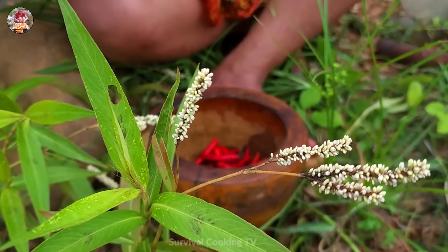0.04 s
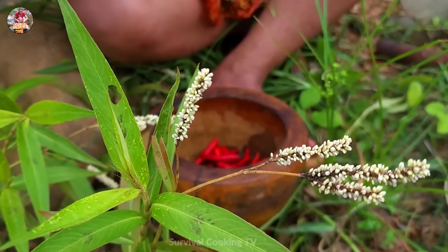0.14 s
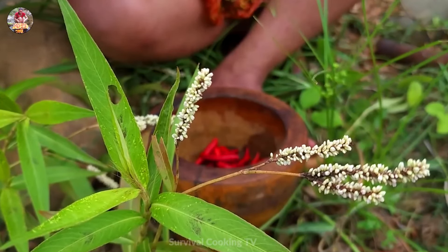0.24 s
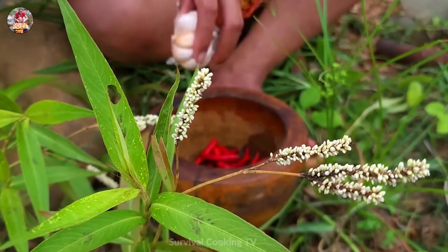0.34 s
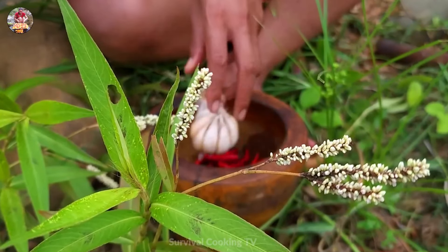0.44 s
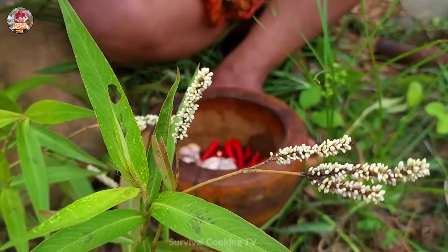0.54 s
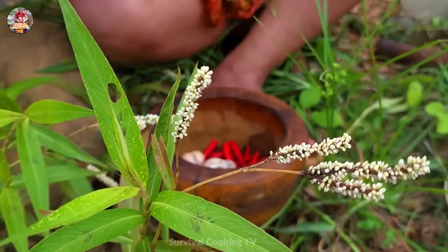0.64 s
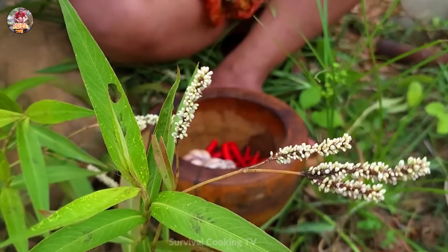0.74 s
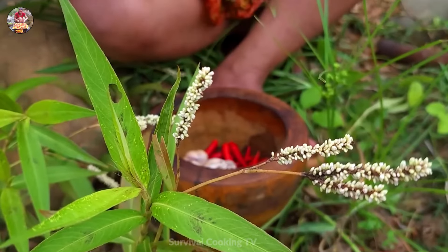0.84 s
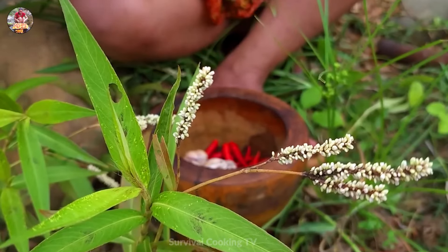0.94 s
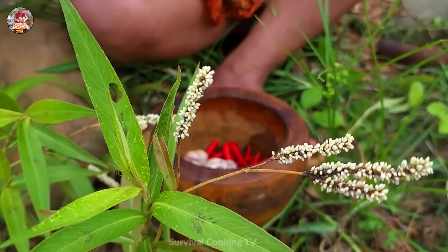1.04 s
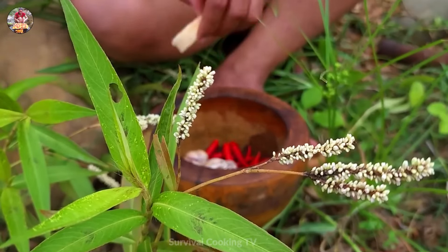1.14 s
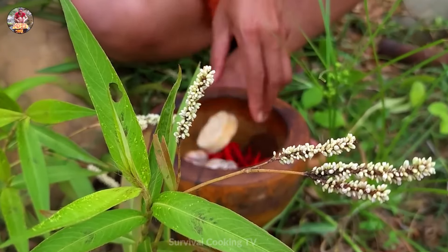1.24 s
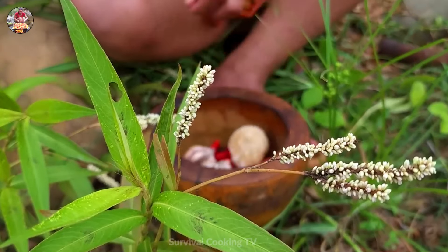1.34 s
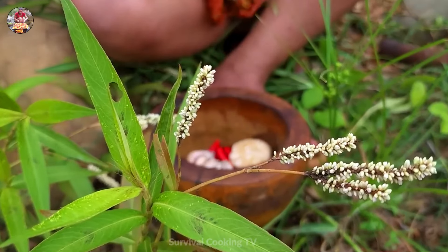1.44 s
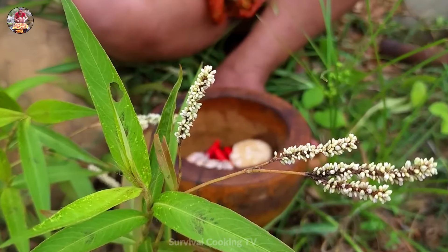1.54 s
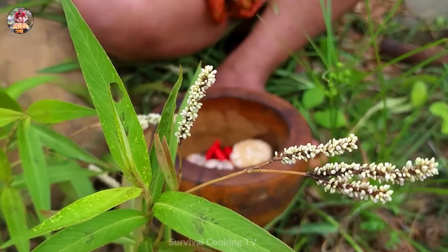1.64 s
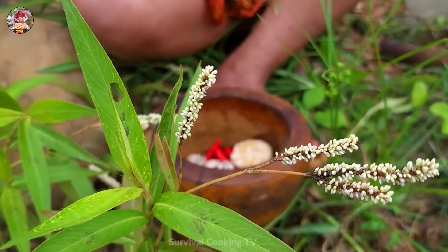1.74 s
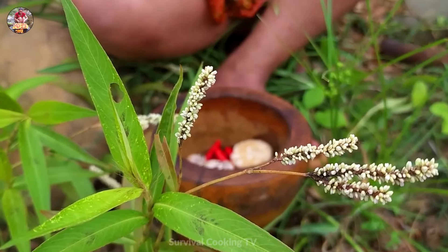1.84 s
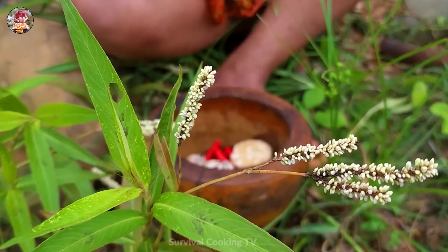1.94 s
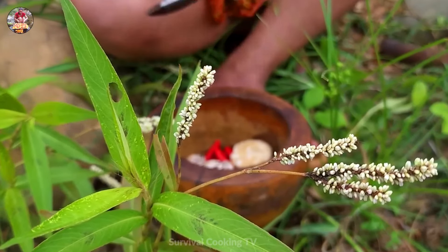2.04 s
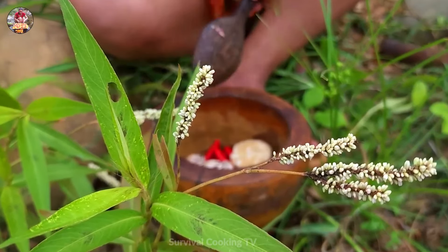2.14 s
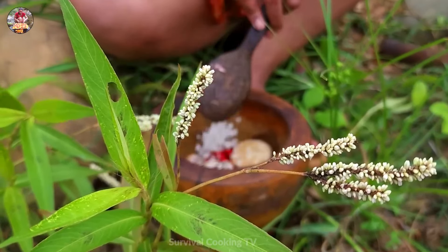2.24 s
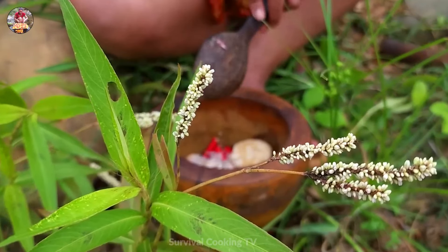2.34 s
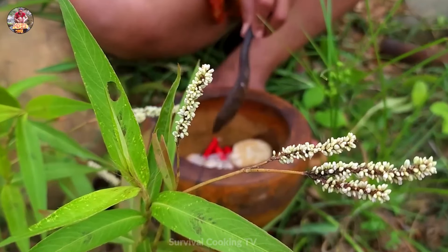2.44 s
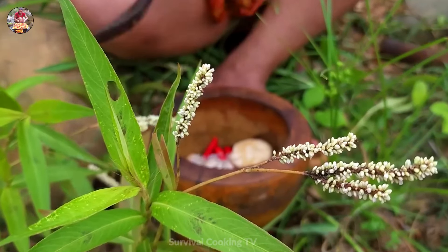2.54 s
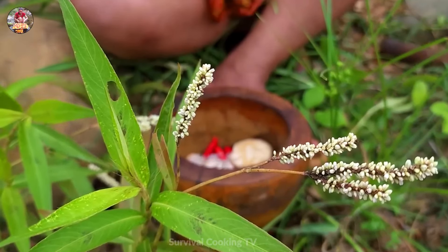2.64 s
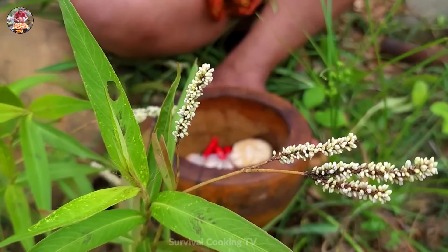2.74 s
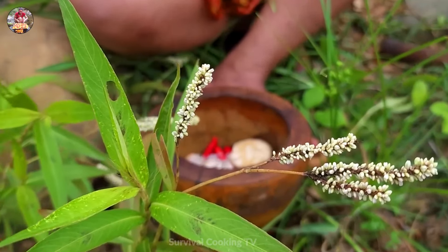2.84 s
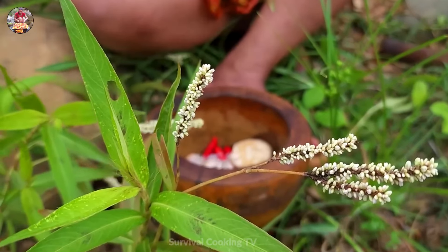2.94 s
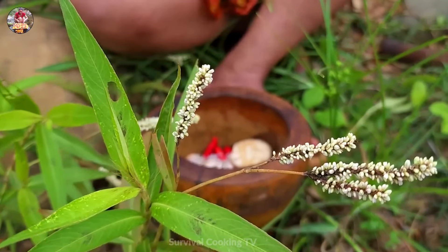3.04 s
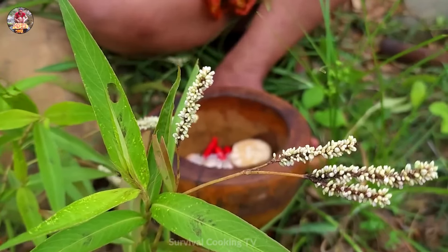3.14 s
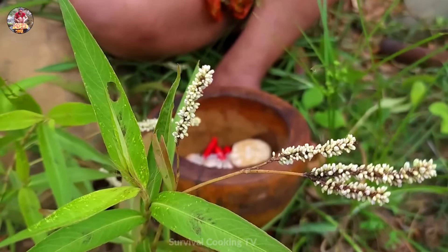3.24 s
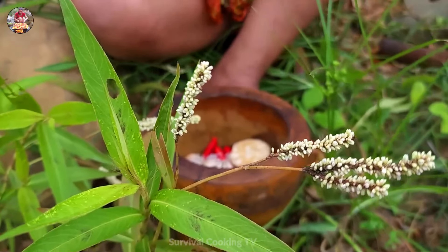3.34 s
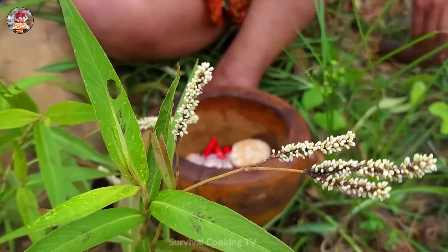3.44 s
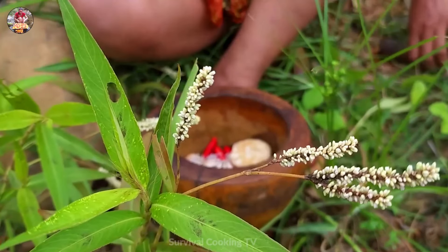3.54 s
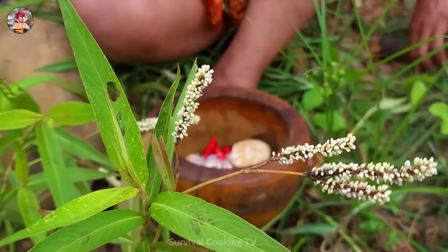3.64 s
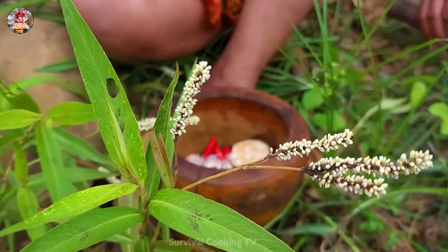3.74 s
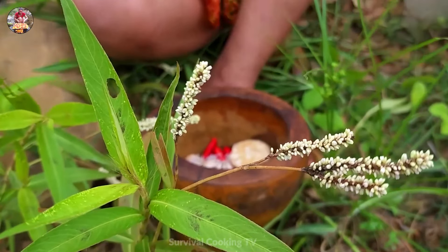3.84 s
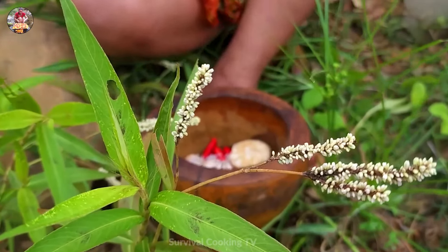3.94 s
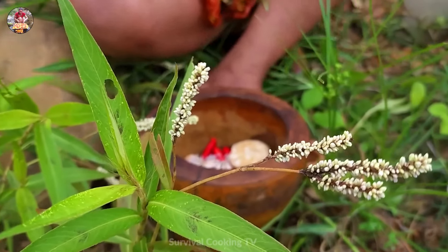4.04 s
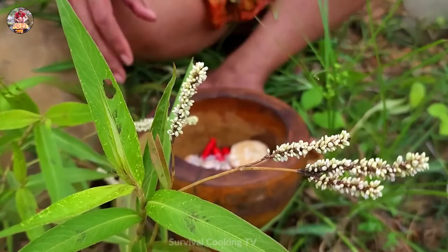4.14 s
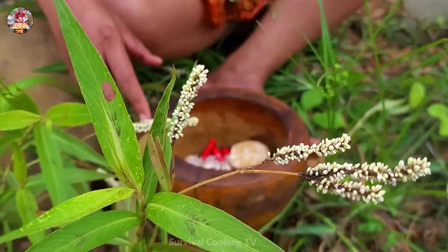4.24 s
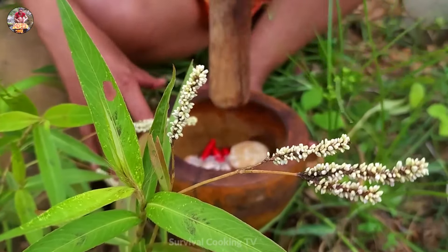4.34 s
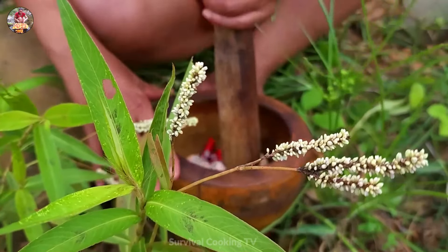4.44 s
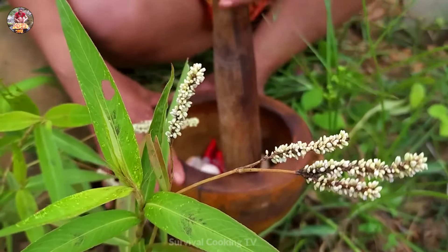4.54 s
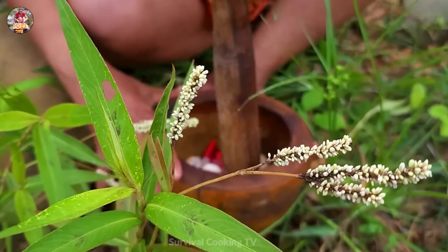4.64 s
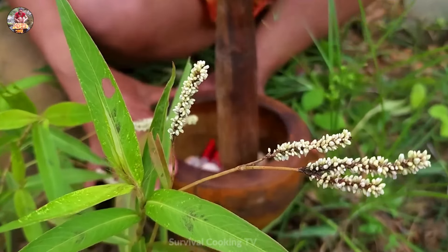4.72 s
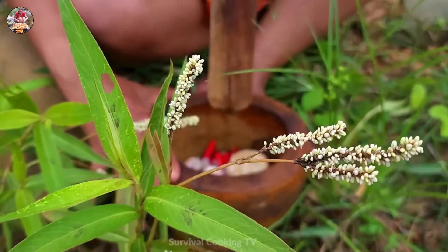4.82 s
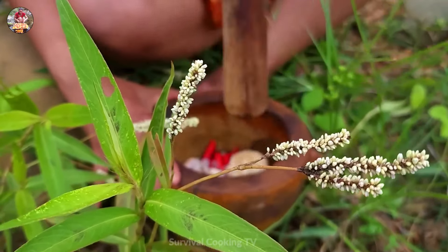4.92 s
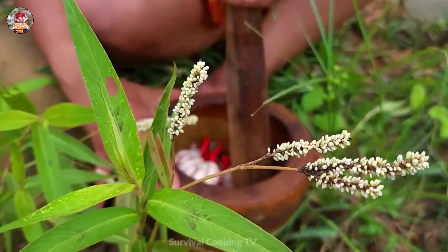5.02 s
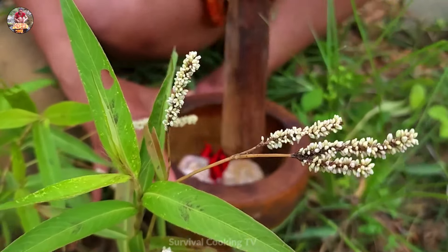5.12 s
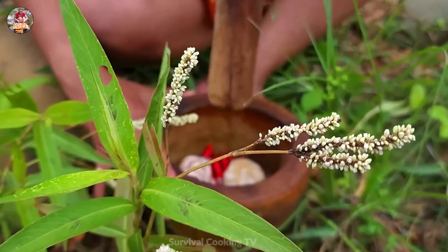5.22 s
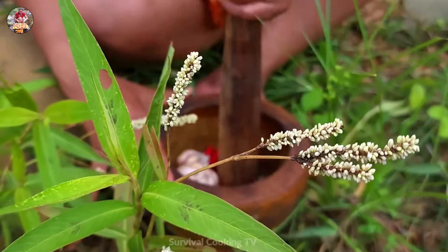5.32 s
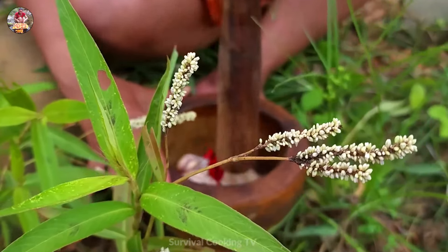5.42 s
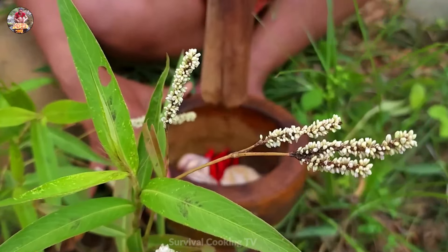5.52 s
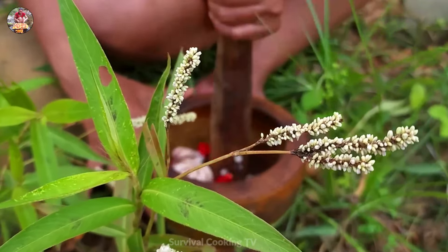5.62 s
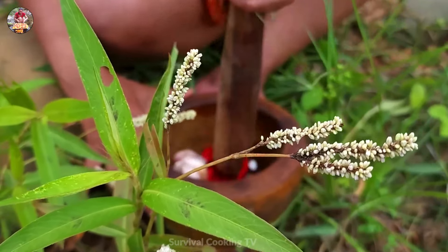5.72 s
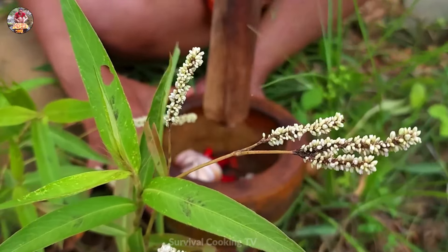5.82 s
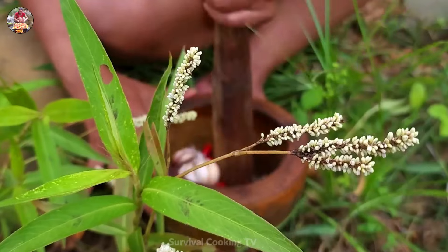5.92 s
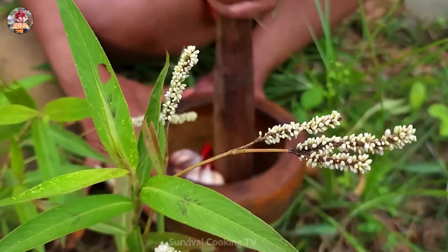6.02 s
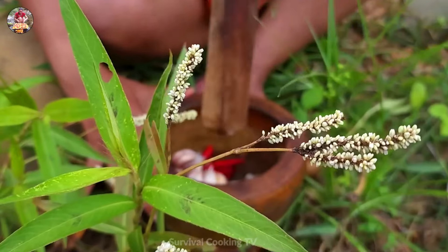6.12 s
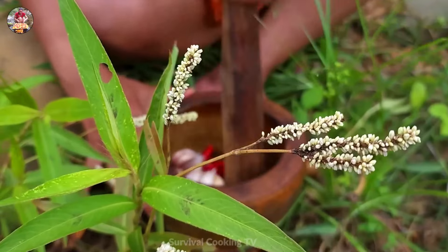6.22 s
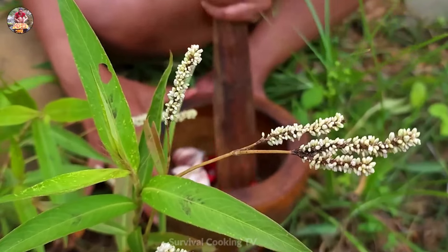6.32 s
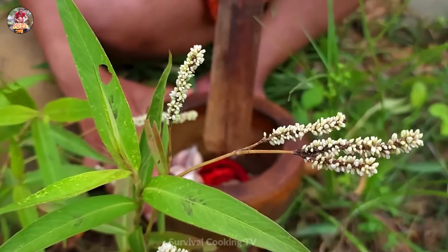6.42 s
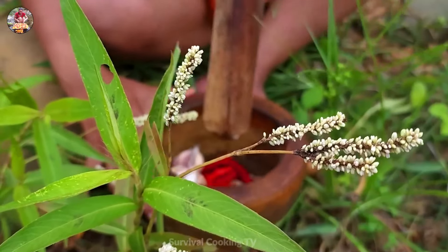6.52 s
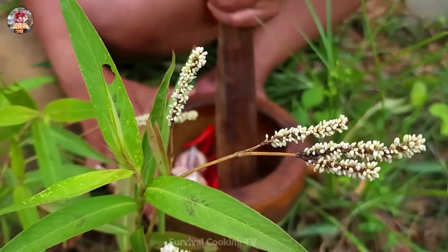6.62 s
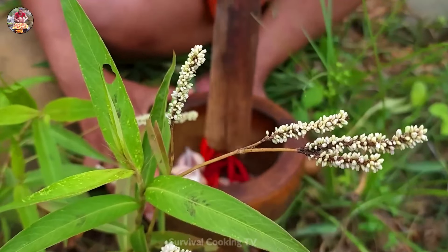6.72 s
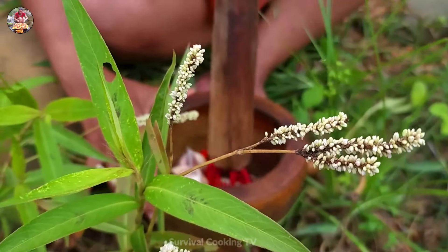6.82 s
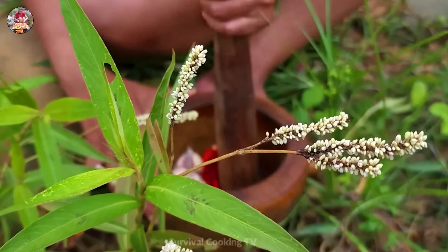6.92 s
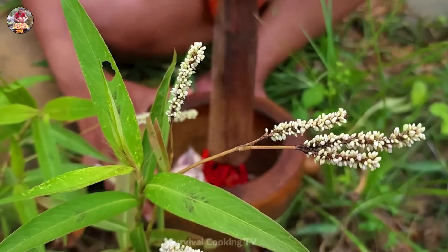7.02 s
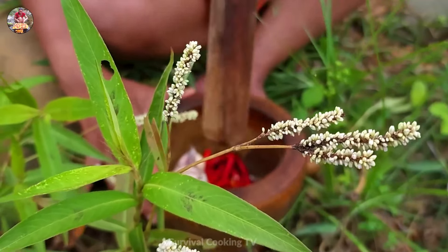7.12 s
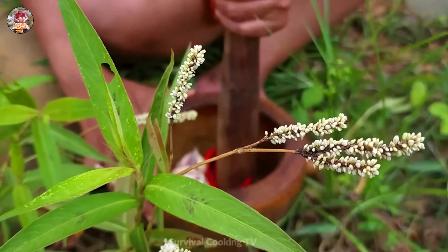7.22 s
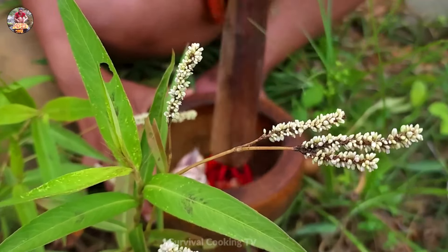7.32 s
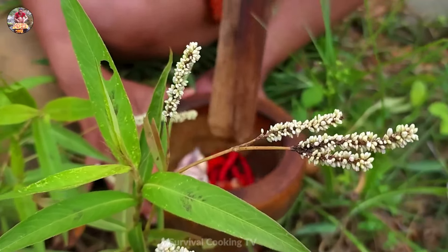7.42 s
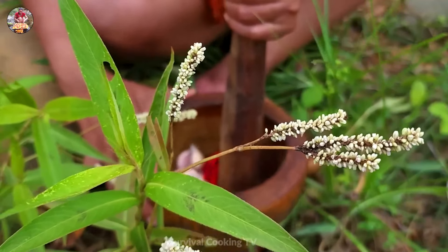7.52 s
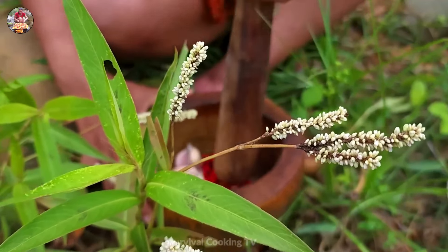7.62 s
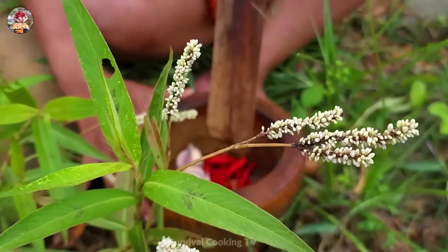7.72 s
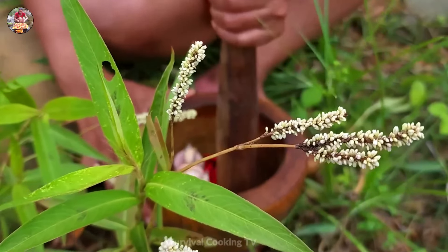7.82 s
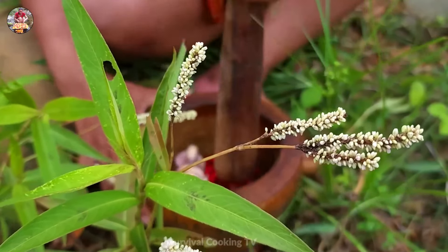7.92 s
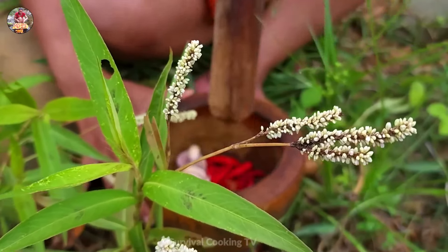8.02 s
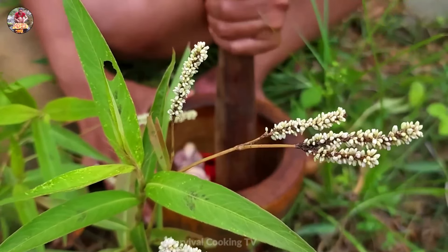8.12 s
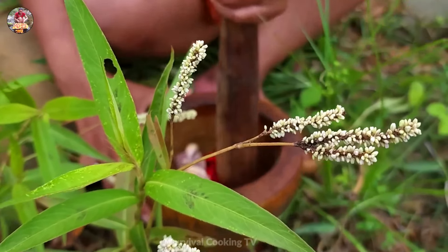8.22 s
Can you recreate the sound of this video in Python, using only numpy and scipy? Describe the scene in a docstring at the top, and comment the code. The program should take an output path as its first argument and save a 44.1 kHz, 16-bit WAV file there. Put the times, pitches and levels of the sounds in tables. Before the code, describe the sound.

Food lands in a clay mortar with light clicks and one dull snap, and salt slides off a tapped spoon. After a few more small contacts, a wooden pestle pounds chillies and garlic in a steady run of twelve close knocks, sharp and crunchy at first, then cushioned by pulp. Behind it, in the open air, are a soft river hiss, quiet insect chirps, a low hum and slight wind on the microphone.

```python
"""A wooden pestle pounds chillies, garlic and salt in a clay mortar, about three blows a second.
The mortar stands on the grass in the open air; first a lump drops in and salt slides off a spoon.
Early blows crack through to the clay; later ones thud, cushioned by pulp. Each knock is smeared
differently in left and right, so it swells in and sounds wide. Behind the mortar a river hisses, an
insect scrapes out four chirps a second and there is a low hum, while air buffets the microphone."""
import sys
import numpy as np
from scipy import signal
from scipy.fft import rfft, irfft
from scipy.io import wavfile

SR = 44100
rng = np.random.default_rng(int(sys.argv[2]) if len(sys.argv) > 2 else 0)


def int16_out(signal):
    """Quantize to a 16-bit WAV file."""
    q = np.round(np.clip(np.atleast_2d(signal).T, -1, 1) * 32767)
    wavfile.write(sys.argv[1], SR, q.astype(np.int16))


N = 364707
TIME = np.arange(N) / SR
SIZE = 16384  # samples in one event
AGE = (np.arange(SIZE) - SIZE // 2) / SR  # seconds around the event's moment
BOWL_HZ, BOWL_T60_S = 526.4, 0.1  # the air in the bowl


def undb(db):
    """Decibels to gain."""
    return 10 ** (np.asarray(db) / 20)


def curve(rows):
    """Gain over time from (s, dB) points."""
    return undb(np.interp(TIME, *np.transpose(rows)))


def unit(x):
    """Scale to rms 1."""
    return x / np.sqrt(np.mean(x ** 2))


def colour(x, points):
    """Filter by a spectrum of (Hz, dB) points."""
    hz, db = np.transpose(points)
    freq = np.fft.rfftfreq(x.shape[-1], 1 / SR) + 1
    gain = undb(np.interp(np.log(freq), np.log(hz), db))
    return irfft(rfft(x) * gain, x.shape[-1])


def burst(x, db):
    """Give an event the energy of 10 ms at this level."""
    return x * undb(db) / np.sqrt(np.sum(x ** 2, axis=-1, keepdims=True) * 100 / SR)


def swell(rise_s, fall_s, age=AGE):
    """Envelope that grows to the event's moment and dies away."""
    return np.exp(-np.abs(age) / np.where(age < 0, rise_s, fall_s))


def ring(modes, hardness_db=0, pitch=1, length=1):
    """Damped modes after one push; a harder contact favours the high ones by hardness_db per octave."""
    age, out = np.maximum(AGE, 0), 0
    for k, (hz, db, t60) in enumerate(modes):
        # every blow lands on another spot, which shifts the upper modes and their shares
        shift, share_db = rng.standard_normal(2) * [.014, 2.0] * (k > 0)
        life = t60 * length ** (1 / (k + 1))  # the pestle damps the lowest mode most
        swing = np.sin(2 * np.pi * hz * pitch * (1 + shift) * age) * np.exp(-np.log(1000) * age / life)
        mode_db = db + share_db + hardness_db * np.log2(hz / modes[0][0])
        out = out + (-1) ** k * burst(swing, mode_db)  # neighbours swing opposite ways
    return out


def smear(x, spread_s, turns):
    """Scatter each frequency a little early or late; left leads here, right there, the colour stays."""
    scatter = np.fft.ifftshift(rng.standard_normal((2, SIZE)) * swell(spread_s, spread_s), axes=-1)
    shared, apart = unit(rfft(scatter).imag)
    lead = np.pi / 4 * np.tanh(10 * apart)
    phase = 2 * np.pi * turns * shared + np.array([lead, -lead])
    return irfft(rfft(x) * np.exp(1j * phase))


def pan(x, db):
    """Make the left channel louder than the right by db."""
    return x * undb(np.array([[db], [-db]]) / 2)


def add(out, x, s):
    """Mix an event in around time s."""
    start = int(s * SR) - SIZE // 2
    lo, hi = max(start, 0), min(start + SIZE, N)
    out[:, lo:hi] += x[:, lo - start:hi - start]


def walk(rate):
    """Random wander with a spread near 1, at rate steps a second."""
    steps = rng.standard_normal(N // 100)
    return np.interp(TIME * rate, np.arange(len(steps)), steps)


def river(ripple_db=2.5):
    """Water hisses wide across the background; each octave ripples on its own."""
    # The background hiss drops suddenly at about 4.5 s, then sinks slowly. Each row: time in seconds, level in
    # dB.
    levels = [(0, -55.5), (3.4, -55), (4.42, -58), (4.55, -63.5), (8.27, -70.5)]
    # The colour of the water. Each row: frequency in Hz, gain in dB.
    spectrum = [(60, -26.5), (130, -6.5), (230, -6), (290, -4), (350, 3.5), (430, 4), (510, -2.5), (600, 0),
                (800, -1), (1000, -2.5), (1380, 1), (1900, -6.5), (2250, -3.5), (2780, -8.5), (3500, -5),
                (5500, -11.5), (6700, -12.5), (7400, -11), (8200, -16), (9800, -23), (13000, -18)]
    water = rfft(colour(rng.standard_normal((2, N)), spectrum))
    octave = np.log2(np.maximum(np.fft.rfftfreq(N, 1 / SR), 32))
    out = 0
    for k in range(5, 16):
        band = irfft(water * np.maximum(1 - np.abs(octave - k), 0), N)
        out = out + band * undb(ripple_db * walk(14))
    return unit(out) * curve(levels)


def hum(hz=59.5, loud_db=-51.5, quiet_db=-64.5, step_s=.85):
    """A low, slightly wavering hum starts loud, then steps down."""
    phase = 2 * np.pi * hz * TIME + .25 * walk(3)
    tone = np.array([np.sin(phase), np.sin(phase + 1.9)])
    return unit(tone) * curve([(step_s - .02, loud_db), (step_s + .02, quiet_db)])


def buffeting(gust_db=3):
    """Air hits the microphone in uneven bumps."""
    # The strength of the buffeting. Each row: time in seconds, level in dB.
    levels = [(0, -57), (.8, -58), (.9, -68.5), (3.8, -73.5), (3.92, -54), (4.43, -51.5), (4.52, -70.5),
              (5.1, -59), (6.0, -69), (8.27, -61.5)]
    # The colour of the rumble. Each row: frequency in Hz, gain in dB.
    spectrum = [(20, -0.5), (42, -1), (70, 5.5), (110, -1), (170, -11), (300, -48.5)]
    rumble = colour(rng.standard_normal((2, N)), spectrum)
    return unit(rumble * undb(gust_db * walk(21))) * curve(levels)


def scrape(spectrum, teeth_db=3.5):
    """An insect's uneven tooth strikes sound through a resonance."""
    strikes = rng.standard_normal((2, SIZE)) * undb(teeth_db * walk(154.6)[:SIZE])
    return unit(colour(strikes, spectrum))


def high_insect():
    """A high caller gives two pairs of short scrapes."""
    # Its calls. Each row: time in seconds, level in dB.
    calls = [(0.049, -57), (.14, -55.5), (3.309, -54), (3.39, -53)]
    # Its resonance. Each row: frequency in Hz, gain in dB.
    resonance = [(4200, -40), (5300, 8), (5700, 3), (6300, 1), (7500, -29)]
    out = np.zeros((2, N))
    for s, db in calls:
        add(out, scrape(resonance) * swell(0.019, 0.016) * undb(db), s)
    return out


def chirping_insect(first_s=.392, period_s=.24327, quicken_s=.000178, glide_per_s=.6):
    """Each wing scrape starts low and quiet, swells with rising pitch and stops fast, with a faint echo."""
    # How it warms to its song. Each row: time in seconds, level in dB, wing tone in Hz.
    song = [(.4, -70.5, 3800), (1.848, -54, 3807), (2.549, -53.5, 3880), (3.248, -48.5, 4180),
            (4.15, -44, 4124), (5.4, -56, 4086), (6.398, -57.5, 4090), (8.1, -59.5, 4160)]
    # The rasp's resonance at a wing tone of rasp_tone_hz. Each row: frequency in Hz, gain in dB.
    resonance = [(2400, -59), (3200, -3.5), (3600, -3), (4000, 6.5), (4350, 12.5), (4700, -13), (5600, -26)]
    # The quiet, lower lead-in to each chirp. Each row: frequency in Hz, gain in dB.
    lead_in = [(2900, -36.5), (3450, -10), (3620, -1.5), (3800, -10.5), (4200, -32)]
    rasp_tone_hz, rise_s, fall_s = 4095, 0.043, .014
    tone_db, rasp_db, lead_db, echo_db = -2.0, -1.5, -14, -17  # relative to the song's level
    stroke = np.exp(-np.abs(AGE / np.where(AGE < 0, rise_s, fall_s)) ** 1.4)
    envelope = stroke + undb(echo_db) * swell(0.0091, 0.06)
    travel = np.cumsum(1 + glide_per_s * np.minimum(AGE, 0)) / SR  # speeds up until the peak
    song_s, song_db, song_hz = np.transpose(song)
    out = np.zeros((2, N))
    for k in range(33):
        s = first_s + k * period_s - quicken_s * k ** 2 / 2  # the beat quickens very slightly
        db, hz = np.interp(s, song_s, song_db), np.interp(s, song_s, song_hz)
        flutter = np.array([walk(166.4)[:SIZE] + 1j * walk(171.1)[:SIZE] for _ in range(2)])
        tone = unit(np.real(flutter * np.exp(2j * np.pi * hz * travel)))
        position = travel * SR * hz / rasp_tone_hz  # the rasp follows the tone's pitch
        rasp = np.array([np.interp(position, np.arange(SIZE), side) for side in scrape(resonance)])
        add(out, (undb(tone_db) * tone + undb(rasp_db) * rasp) * envelope * undb(db), s)
        add(out, scrape(lead_in) * swell(0.027, 0.098) * undb(db + lead_db), s - .07)
    return out


def ticks():
    """Food, fingers and spoon make small dry contacts: a bright click over a dull body."""
    # The contacts. Each row: time in seconds, click level in dB, body level in dB.
    contacts = [(.519, -54, -65), (0.55, -50, -50.5), (1.188, -55, -78), (1.319, -52, -72),
                (1.34, -53.5, -70), (2.191, -54.5, -75), (2.285, -48.5, -75), (2.309, -40, -68),
                (2.987, -43.5, -40), (3.026, -49, -40), (3.055, -70, -44.5), (3.804, -60, -50.5),
                (4.012, -44.5, -55), (5.215, -65, -77), (6.416, -60, -75), (7.068, -66.5, -72),
                (7.694, -83, -63)]
    # The colours of click and body. Each row: frequency in Hz, gain in dB.
    click_colour = [(1000, -6.5), (3000, 0), (4500, 4.5), (7000, 10), (7650, 6), (8400, 1), (10000, -4),
                    (12000, 7), (15500, 0)]
    body_colour = [(130, -22), (250, 10), (480, 2), (800, 5), (1300, 2.5), (2500, -5), (4500, -1),
                   (9000, -23)]
    out = np.zeros((2, N))
    for s, click_db, body_db in contacts:
        click = colour(rng.standard_normal(SIZE) * swell(.0013, .0026), click_colour)
        body = colour(rng.standard_normal(SIZE) * swell(.0018, .008), body_colour)
        add(out, smear(burst(click, click_db) + burst(body, body_db), spread_s=0.0016, turns=0.22), s)
    return out


def lump(s=1.4295):
    """A soft lump drops in with a dull snap; with no pestle on it, the mortar rings lower and longer."""
    out = np.zeros((2, N))
    bowl = ring([(BOWL_HZ, -32, BOWL_T60_S)], length=1.32)
    bowl = colour(bowl, [(150, -23), (450, 1)])  # too light to shake the mortar
    wall = clack(db=-22.5, tilt_db=-12, pitch=.885, length=0.9)
    wall = colour(wall, [(150, -12), (1200, 0.5), (1800, -9), (3600, 6)])  # the lowest mode dominates
    add(out, smear(bowl, spread_s=0.0011, turns=0.25) + wall, s - .0023)
    snap = colour(crunch(db=-43.5), [(3600, 7.5), (5000, -2.5), (7600, 1.5), (10000, -16)])
    add(out, snap, s)
    return out


def clack(db, tilt_db, pitch, length):
    """The clay wall rings, a little to the left; being small, it radiates little bass."""
    # The wall's modes, which shift together with the way it is touched.
    # Each row: frequency in Hz, level in dB, t60 in seconds.
    modes = [(1362, -0.5, 0.048), (1596, -3, 0.052), (1914, -1, 0.023), (2345, 2, 0.037), (2640, -8, 0.015),
             (3085, -6.5, 0.047), (3690, -7.5, 0.013), (4460, -8.5, 0.028)]
    radiation = [(400, -32.0), (900, -10), (1200, -1.0), (4500, 0.0), (9000, -9.5)]
    wall = colour(ring(modes, tilt_db, pitch, length), radiation)
    return pan(smear(burst(wall, db), spread_s=0.0016, turns=0.29), db=2.5)


def crunch(db, squelch_db=-11.5):
    """A sharp crack amid the brief wet squelch of the pulp, a little to the right."""
    # Tearing skins and seeds. Each row: frequency in Hz, gain in dB.
    spectrum = [(700, -7.5), (1400, -2.5), (2700, -7.5), (3700, -4.5), (4400, -1), (5300, -4), (6400, -7),
                (7500, -5.5), (8600, -17), (10500, -19.5), (12000, -16), (15500, -18.5)]
    crush = swell(0.0031, 0.0039) + undb(squelch_db) * swell(0.0069, 0.013)
    tearing = colour(rng.standard_normal(SIZE) * crush, spectrum)
    return pan(smear(burst(tearing, db), spread_s=0.0015, turns=0.078), db=-1.5)


def salt(pour_s=2.325, rush_db=-38.5, trickle_db=-50.5, grain_db=4):
    """Uneven grains, tapped off a ringing spoon, patter into the bowl: one rush inside a thin trickle."""
    # The colour of the patter. Each row: frequency in Hz, gain in dB.
    spectrum = [(500, -13), (1500, 5), (2600, -1), (4000, 7), (6500, 7.5), (7250, -1), (7650, 7), (8200, 0),
                (10000, -7), (12500, 1), (15000, -0.5)]
    # Taps on the spoon. Each row: time in seconds, level in dB.
    taps = [(2.284, -41), (2.309, -35)]
    # The spoon's ring, damped by the salt. Each row: frequency in Hz, level in dB, t60 in seconds.
    spoon_modes = [(7650, -2, .045), (15000, -8, .025)]
    grains = rng.standard_normal((2, N)) * undb(grain_db * walk(600))
    rush = undb(rush_db) * swell(0.0099, 0.013, TIME - pour_s)
    trickle = undb(trickle_db) * swell(0.16, 0.16, TIME - pour_s)
    out = unit(colour(grains, spectrum)) * (rush + trickle)
    for s, db in taps:
        add(out, smear(burst(ring(spoon_modes), db), spread_s=0.0012, turns=.12), s)
    return out


def thud(db, tilt_db, length, low_hz=140, high_hz=860):
    """A soft push rocks mortar and pestle on the soil."""
    # The rocking modes. Each row: frequency in Hz, level in dB, t60 in seconds.
    modes = [(196, 1, 0.071), (264, 3.5, 0.06), (361.3, 3.5, 0.045), (445.4, 1.5, 0.05),
             (586.4, -10, 0.083), (670, -0.5, 0.027), (760.6, -4.5, 0.022)]
    freq = np.fft.rfftfreq(SIZE, 1 / SR) + 1
    soft_push = 1 / np.sqrt((1 + (low_hz / freq) ** 4) * (1 + (freq / high_hz) ** 16))
    rocking = ring(modes, tilt_db, length=length)
    return burst(irfft(rfft(rocking) * soft_push), db)


def pounding():
    """The pestle clacks on the wall, crushes the food and bottoms out, shaking the whole bowl, all within a few
    milliseconds."""
    # The blows. Each row: time in seconds, thud lag in seconds, levels in dB of thud, bowl ring,
    # wall clack and crunch, then the wall's pitch as a factor set by the spot the pestle touches.
    blows = [(4.475, .004, -72, -44.5, -33.5, -36, 1.02), (5.0331, .003, -46, -37, -26, -29.5, 0.97),
             (5.3471, 0.0029, -30, -43.5, -28, -30, 0.94), (5.6584, 0.0024, -27.5, -41, -23, -25.5, 0.96),
             (5.9683, .0023, -26, -35.5, -29, -36, .99), (6.2946, 0.0016, -29.5, -50, -28, -26.5, 0.99),
             (6.6233, 0.00083, -21, -32.5, -38.5, -33, 0.94), (6.9188, 0.004, -21.5, -36, -37, -34, 0.94),
             (7.227, 0.0016, -25, -51, -30.5, -37, 1.017), (7.5335, 0.00252, -26.5, -34, -53, -39.5, 1.02),
             (7.846, 0.00213, -24, -34.5, -65.5, -39.5, 1.3), (8.1545, 0.0029, -21.5, -32, -66, -35.5, 1.0)]
    pressed_wall, pressed_bowl, pressed_thud = .65, 0.63, 0.59  # the pestle's pressure shortens the rings
    first_s = blows[0][0]
    out = np.zeros((2, N))
    for s, lag, thud_db, bowl_db, clack_db, crunch_db, wall_pitch in blows:
        thud_tilt = -6.5 + 3.5 * (s - first_s)  # dB per octave: tighter as the paste packs down
        body = thud(thud_db, thud_tilt, pressed_thud)
        bowl = ring([(BOWL_HZ, bowl_db, BOWL_T60_S)], length=pressed_bowl)
        add(out, smear(body + bowl, spread_s=0.0014, turns=0.37), s + lag - .003)
        clack_tilt = 3.5 + 0.02 * (clack_db + 36)  # dB per octave: a harder clack is brighter
        add(out, clack(clack_db, clack_tilt, wall_pitch, pressed_wall), s - .0025)
        add(out, crunch(crunch_db), s)
    return out


def scene(dip_s=2.73, dip_width_s=0.16, dip_db=-14):
    """Everything sounds in the open air, with no room; the bass dips briefly."""
    foreground = lump() + pounding() + ticks() + salt()
    background = chirping_insect() + high_insect() + river()
    bass_dip = undb(dip_db * np.exp(-((TIME - dip_s) / dip_width_s) ** 2))
    return foreground + background + (hum() + buffeting()) * bass_dip


def record(dry, top_hz=15850):
    """The recorder cuts the top."""
    return signal.sosfilt(signal.ellip(10, .1, 80, top_hz, fs=SR, output="sos"), dry)


dry = scene()
out = record(dry)
int16_out(out)
```